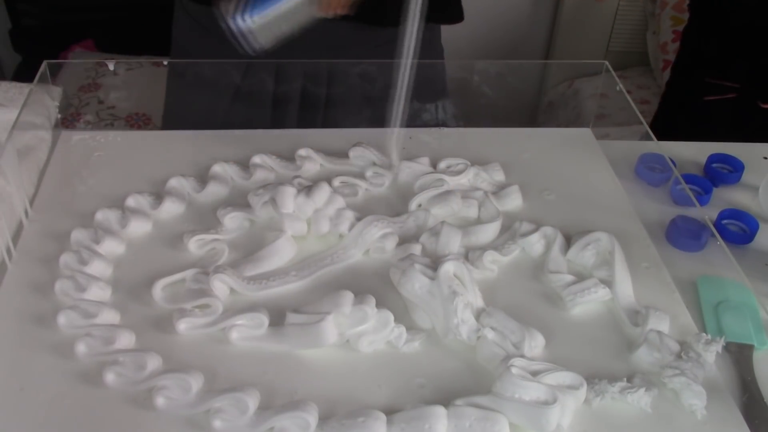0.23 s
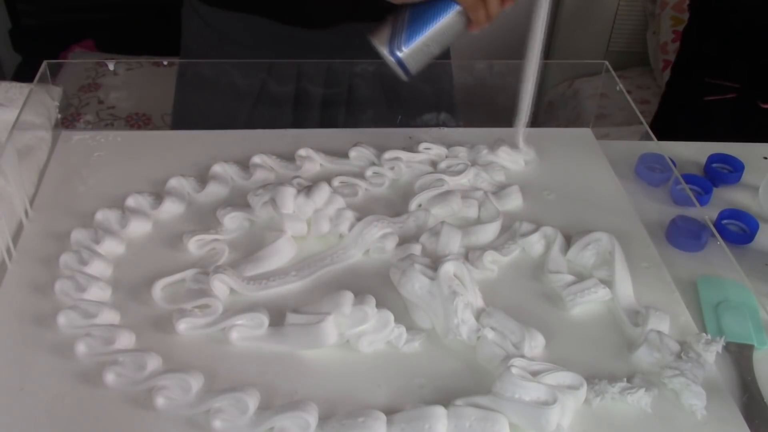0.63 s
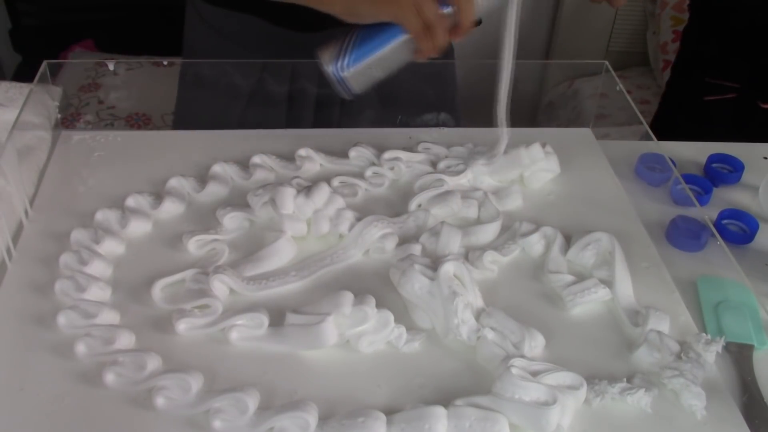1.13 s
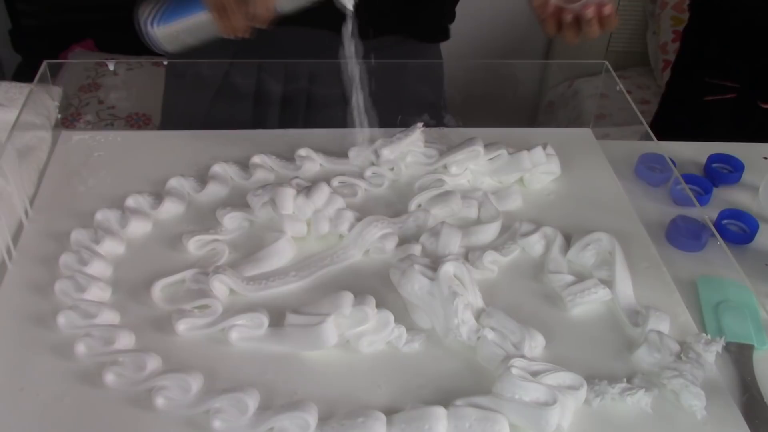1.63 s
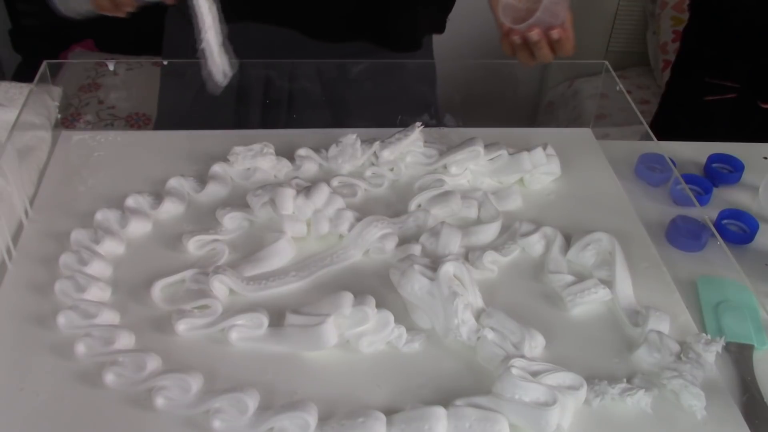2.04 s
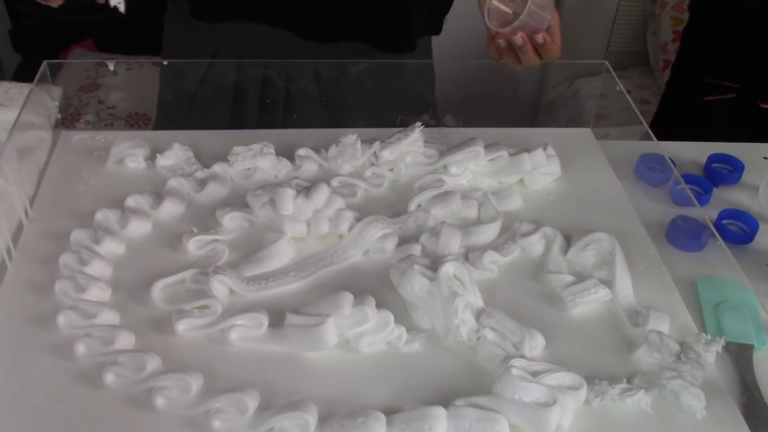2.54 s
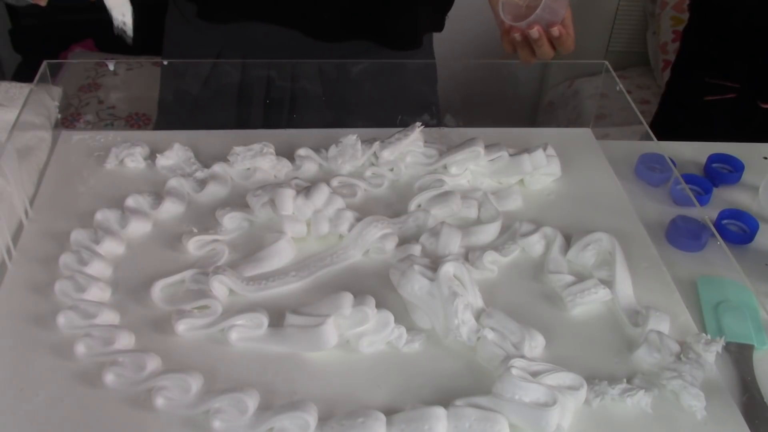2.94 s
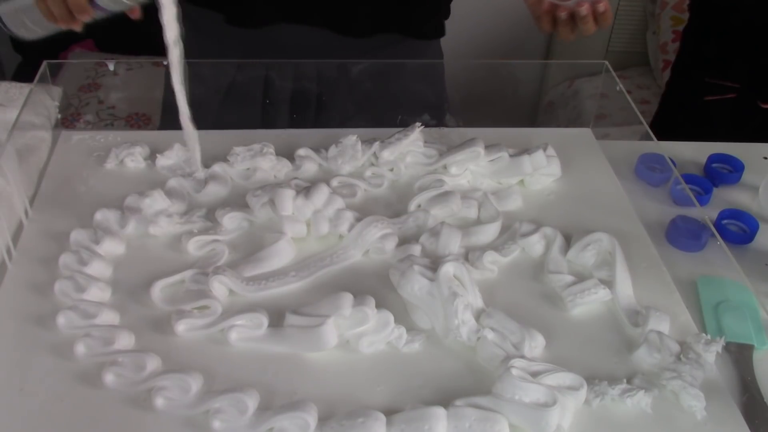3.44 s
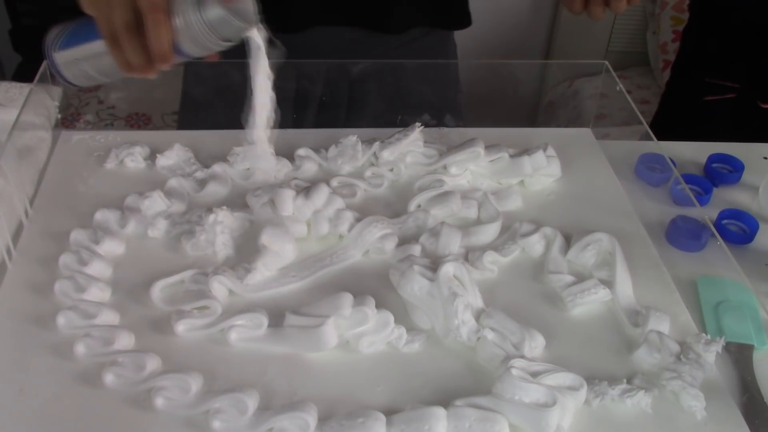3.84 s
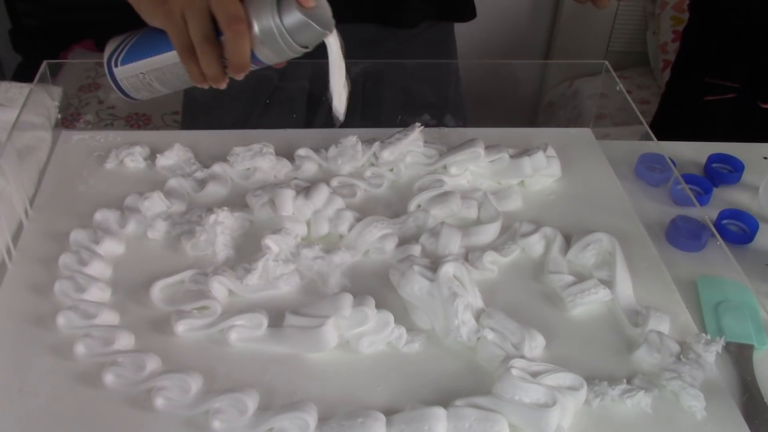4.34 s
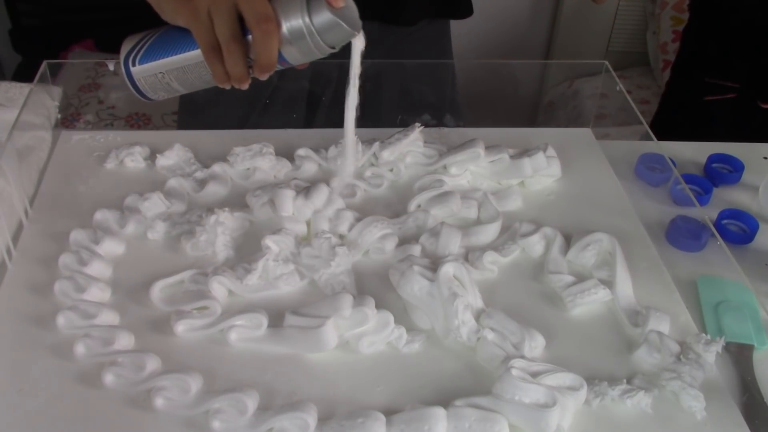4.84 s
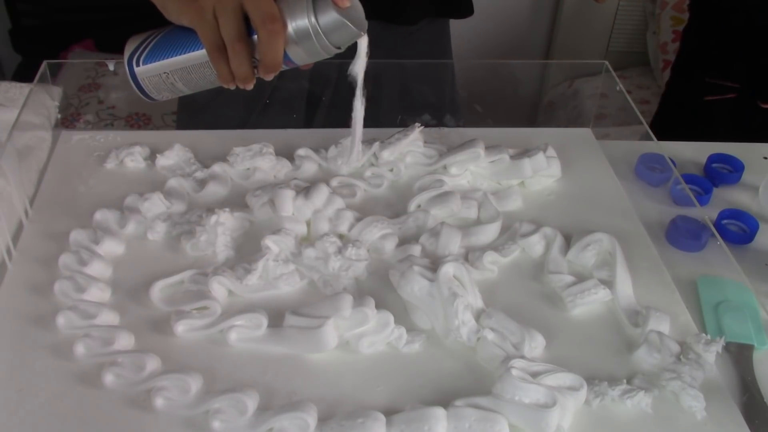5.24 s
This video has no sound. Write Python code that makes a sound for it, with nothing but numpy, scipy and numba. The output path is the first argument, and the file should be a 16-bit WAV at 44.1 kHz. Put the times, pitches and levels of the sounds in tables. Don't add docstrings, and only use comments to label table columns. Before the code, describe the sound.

Foam hisses softly from an aerosol can, then sputters into loud crackling bursts, pauses briefly, and sputters on to the end, close up in a small room.

```python
import sys
import numpy as np
from scipy import signal
from scipy.fft import rfft, irfft
from scipy.io import wavfile
from scipy.ndimage import uniform_filter1d
from numba import njit

SR = 44100
rng = np.random.default_rng(int(sys.argv[2]) if len(sys.argv) > 2 else 0)


def wrap_up_sound(samples):
    columns = np.atleast_2d(samples).T
    tamed = np.clip(columns, -1, 1)
    steps = np.round(tamed * 32767).astype(np.int16)
    wavfile.write(sys.argv[1], SR, steps)


def ratio(d):
    e = np.asarray(d, float) / 20
    return 10 ** e


N = 242726
T = np.arange(N) / SR
TAPS = 2048
FREQ = np.maximum(np.arange(TAPS // 2 + 1) * SR / TAPS, 1)


def shape_db(points, modes=()):
    hz, db = np.transpose(points)
    bumps = sum(boost / (1 + (2 * (FREQ - f) / width) ** 2) for f, width, boost in modes)
    return np.interp(np.log(FREQ), np.log(hz), db) + bumps


def shelf_db(hz, low_db, high_db, octaves=0.27):
    return low_db + (high_db - low_db) / (1 + (hz / FREQ) ** (2 / max(octaves, .1)))


def causal(db):
    ceps = irfft(db * np.log(10) / 20)
    ceps[1:TAPS // 2] *= 2
    ceps[TAPS // 2 + 1:] = 0
    return irfft(np.exp(rfft(ceps)))


def colour(x, db, lo_hz, hi_hz):
    inside = (FREQ > lo_hz) & (FREQ < hi_hz)
    power = np.sum(ratio(db[inside]) ** 2) / len(FREQ)
    return signal.oaconvolve(x, causal(db) / np.sqrt(power))[:len(x)]


@njit
def band(x, hz, width):
    y, b, l = np.empty(len(x)), 0., 0.
    for i in range(len(x)):
        g, k = np.tan(np.pi * hz[i] / SR), width / hz[i]
        v = (b + g * (x[i] - l)) / (1 + g * (g + k))
        b, l, y[i] = 2 * v - b, l + 2 * g * v, k * v
    return y


def noise():
    return rng.standard_normal(N)


def walk(rate):
    k = int(SR / rate)
    held = np.repeat(rng.standard_normal(N // k + 1), k)
    return 1.2 * uniform_filter1d(uniform_filter1d(held, k), k)[:N]


def curve(table, column):
    rows = np.array(table)
    return np.interp(T, rows[:, 0], rows[:, column], left=-120, right=-120)


def strikes(table):
    rows, out = np.array(table), np.zeros(N)
    at = np.minimum((rows[:, 0] * SR).astype(int), N - 1)
    np.add.at(out, at, ratio(rows[:, 1]))
    return out


# f/Hz, level/dB per Hz
HUM = [(15, -62), (25, -35.5), (59, -28), (129, -1.5), (183, -10), (340, -2), (582, -13), (1340, -13.5),
       (2170, -18), (2920, -15), (6500, -27), (15500, -42)]


def hum():
    level_db = -52 + 0.75 * walk(6.7)
    return ratio(level_db) * colour(noise(), shape_db(HUM), 0, 20000)


def crackle(rate, spread_db):
    size_db = spread_db * np.minimum(rng.exponential(size=N), 2)
    out = (rng.random(N) < rate / SR) * ratio(size_db)
    return out / np.sqrt(np.mean(out ** 2))


def puffs(gas, rise_ms=2.5, fall_ms=1.5):
    power = np.zeros(N)
    for s, db, ms in gas[:, :3]:
        i = int(s * SR)
        power[i:i + int(max(ms - 1.5, 1) * SR / 1000)] = ratio(db) ** 2
    t_ms = np.arange(1024) * 1000 / SR
    edge = np.exp(-t_ms / fall_ms)
    choked = signal.oaconvolve(power, edge / edge.sum())[:N]
    return np.sqrt(np.abs(uniform_filter1d(choked, int(rise_ms * SR / 1000) + 1)))


# t/s, froth level/dB, foam plugging the spout/0-1, gas pressure behind the running pockets' pops/dB
FROTH = [
    [(0, -40.5, 0.36, -30), (.5, -42.5, 0.03, -30), (.95, -39, 0.66, -30), (1.2, -39.5, 0.7, -30),
     (1.335, -33, .72, -26), (1.375, -24, 0.67, -22), (1.5, -26, 0.92, -24), (1.75, -18.5, 0.6, -17),
     (2.05, -19, 0.42, -21), (2.385, -21, 0.02, -37)],
    [(2.824, -36, .7, -28), (2.835, -31, 0.9, -28), (2.94, -30.5, 0.64, -26), (3.05, -26.5, 0.65, -28),
     (3.35, -25.5, 0.57, -24), (3.65, -26.5, 0.62, -30), (3.95, -26.5, 0.5, -17), (4.4, -20.5, 0.19, -23.5),
     (4.9, -20.5, 0, -14.5), (5.51, -21, 0.07, -22)],
]
# f/Hz, level/dB per Hz
STREAM = [(47, -62), (80, -52), (133, -23), (236, -7), (336, -0.5), (499, -0.5), (545, -4.5), (1350, -3.5),
          (1880, -6.5), (2790, -5.5), (3640, -13), (7700, -6.5), (10700, -20.5), (12800, -16), (15600, -30)]
SPUTTER = [(47, -41), (80, -54), (139, -16), (211, -18), (343, -4), (488, 0), (609, -7.5), (1320, -5.5),
           (2440, -7), (2920, -2), (4150, -4), (5410, -4), (8230, -6.5), (13100, -19.5), (15600, -31)]
RESTART = [(47, -52), (80, -36), (145, -20), (216, -17), (328, 1.5), (428, -5.5), (478, 1.5), (570, -3.5),
           (1150, 0), (2100, -5), (3050, 3.5), (4340, -3), (8790, -11), (12800, -20), (15600, -29)]
CLOSE = [(47, -59), (80, -53), (139, -15.5), (216, -17.5), (275, -5.5), (428, -12.5), (499, -3), (558, -10),
         (665, 1), (1010, -2.5), (2050, -3.5), (2920, -3), (4150, -2.5), (8790, -4.5), (15600, -25.5)]
# f/Hz, width/Hz, boost/dB
STREAM_MODES = [(345, 90, 2), (1900, 250, -3), (2420, 200, 3), (2950, 250, 2), (3950, 700, -2),
                (5550, 340, 3), (7740, 150, 2), (12500, 300, 3)]
SPUTTER_MODES = [(330, 74, 0.82), (860, 140, 3), (1710, 290, 7), (2420, 210, -5), (3760, 180, 1),
                 (4130, 290, -2.5), (4570, 130, 2), (5380, 180, 4.5), (6870, 180, 7), (8200, 400, 2.5)]
RESTART_MODES = [(2500, 190, 0.5), (3620, 200, -1.5), (4300, 600, -1), (6630, 440, 4.5), (8600, 500, -7)]
CLOSE_MODES = [(332, 82, 2.5), (2270, 41, 2.5), (3340, 190, 1), (3580, 280, 4), (4160, 130, -1.5),
               (4940, 300, 2.5), (5540, 150, 0), (6180, 120, 3), (7200, 280, 3), (8580, 1100, 5),
               (9830, 250, 4)]
TURNS = [.6, 1.25, 1.45, 2.4, 2.8, 3.6, 4.2]


def spray(rows):
    body_db = np.maximum(curve(FROTH[0], 1), curve(FROTH[1], 1))
    plug = np.clip(np.maximum(curve(FROTH[0], 2), curve(FROTH[1], 2)), 0, 1)
    burble_db = body_db - 16 + 12 * plug
    hiss_db = body_db + 3 - 5.5 * plug
    choked = np.interp(T, [1.24, 1.38], [0, 1])

    bubbly = noise() + (0.38 + 0.69 * choked) * crackle(220, 4.9)
    body = ratio(body_db - 4.0 - 5.73 * choked + 2.12 * walk(60) + 1.4 * walk(15)) * bubbly
    burble = ratio(burble_db - 1.5 + 1.2 * walk(40)) * noise()
    hiss = ratio(hiss_db - 1.5 - 14.7 * choked + 1.3 * walk(90)) * noise()
    gas = ratio(-2.0 + 2.24 * walk(300)) * puffs(rows) * (noise() + .5 * crackle(600, 4.9))

    body_shelf = shelf_db(546, -31.0, 0) + shelf_db(5300, 0, -26.0)
    burble_shelf = shelf_db(650, 0, -36.0)
    hiss_shelf = shelf_db(3600, -7.0, 0)
    gas_shelf = shelf_db(3600, -1.06, 0, octaves=0.5)
    states = [shape_db(STREAM, STREAM_MODES), shape_db(SPUTTER, SPUTTER_MODES),
              shape_db(RESTART, RESTART_MODES), shape_db(CLOSE, CLOSE_MODES)]
    state = np.interp(T, TURNS, [0, 0, 1, 1, 2.5, 2.5, 3])
    out = np.zeros(N)
    for k, db in enumerate(states):
        share = np.clip(1 - np.abs(state - k), 0, 1)
        on = share > 0
        sound = colour(body[on], db + body_shelf, 560, 5300)
        sound += colour(burble[on], db + burble_shelf, 200, 600)
        sound += colour(hiss[on], db + hiss_shelf, 6700, 9800)
        sound += colour(gas[on], db + gas_shelf, 3200, 18000)
        out[on] += np.sqrt(share[on]) * sound
    return out


# t/s, first f/Hz, second f/Hz, ring level/dB
SPOUT = [(0, 1440, 2770, -4), (.3, 1420, 2860, 5), (.75, 1410, 2720, 1), (1.2, 1400, 2780, -1),
         (1.31, 1390, 3200, 2), (1.5, 1310, 2740, 4), (1.7, 1320, 3080, -15), (2.1, 1340, 3020, 4.5),
         (2.4, 1370, 3000, 2), (2.8, 1430, 2560, 6.5), (3.1, 1340, 3000, 3.5), (3.35, 1174, 2680, -4),
         (4, 1020, 2750, -7), (4.3, 1300, 2750, -8.5), (4.65, 1315, 2840, 2.5), (5.05, 1325, 2900, -3.5),
         (5.51, 1370, 2870, 4.5)]
# mean f/Hz, width/Hz, scatter/0-1, level/dB
POCKET = [(5425, 250, 0.1, 0), (6440, 66, 0.2, -9), (8650, 270, 0.08, 3), (9620, 320, .06, 2),
          (12650, 1200, 0.09, 1)]


def cavities(x, starts, glide=0.035):
    s, first_hz, second_hz, ring_db = np.transpose(SPOUT)
    gain = ratio(np.interp(T, s, ring_db) + 2.5 * walk(30))
    drift = np.interp(T, [1.1, 1.4], [1.2, 1])
    first = np.interp(T, s, first_hz) * (1 + 0.021 * drift * walk(11))
    second = np.interp(T, s, second_hz) * (1 + 0.023 * drift * walk(17))
    out = x + gain * band(x, first, 81.0)
    out += 0.9 * gain * band(x, second, 175.0)

    pocket = np.maximum(np.searchsorted(starts, T) - 1, 0)
    age = np.clip((T - starts[pocket]) / 0.011, 0, 1.5)
    chance = rng.standard_normal((len(starts), len(POCKET), 2))
    for k, (hz, width, scatter, db) in enumerate(POCKET):
        wander = 0.98 * chance[pocket, k, 0] + 0.5 * walk(5)
        pitch = uniform_filter1d(hz * (1 + scatter * wander + glide * age), size=44)
        gain = ratio(db + 4.5 * np.clip(chance[pocket, k, 1], -2, .8))
        out += (T > starts[0]) * gain * band(x, pitch, 1. * width)
    return out


def ring(hz, decay_ms):
    t = np.arange(256) / SR
    return np.cos(2 * np.pi * hz * t) * np.exp(-t * 1000 / decay_ms)


# t/s, pop level/dB
STREAM_POPS = [(.097, -21), (.175, -25), (.672, -27), (.798, -27), (.956, -26), (1.011, -27), (1.086, -23),
               (1.212, -21)]
# t/s, pop level/dB
FIRST_RUN = [(1.942, -11), (1.9606, -7), (2.0068, -8), (2.085, -9), (2.1045, -11), (2.157, -10),
             (2.175, -15), (2.1945, -12), (2.2808, -15), (2.2888, -13), (2.2964, -10), (2.3046, -10),
             (2.3237, -14)]
SECOND_RUN = [(3.5134, -5.5), (3.552, -5), (3.58, -9.0), (3.6026, -10), (3.6512, -11.0), (3.7, -4),
              (3.726, -10), (3.7622, -14), (3.7907, -12), (3.816, -12), (3.8292, -7), (3.851, -10),
              (3.8585, -8), (3.8838, -10), (3.914, -16), (3.9326, -10), (3.952, -9.5), (3.9678, -7),
              (3.9914, -8), (3.9982, -5), (4.089, -8), (4.1375, -15), (4.144, -11), (4.166, -7.5),
              (4.178, -7), (4.2322, -10), (4.2943, -4.5), (4.326, -15), (4.3546, -9), (4.4063, -16),
              (4.4279, -8.0), (4.4485, -15), (4.4646, -15), (4.487, -11), (4.583, -12), (4.6131, -8.5),
              (4.6338, -10), (4.728, -9), (4.7594, -12), (4.7834, -13), (4.8355, -14), (5.063, -12.5),
              (5.1, -8.0), (5.1812, -7), (5.3348, -6), (5.4088, -12), (5.4478, -12), (5.4969, -9)]


def pops(rows):
    push = signal.windows.hann(9)
    burst = np.convolve(ring(2950, .22) + .35 * ring(1200, 1.1), push)
    events = np.concatenate([rows[:, [0, 3]], STREAM_POPS, FIRST_RUN, SECOND_RUN])
    lag_s = .0015
    crack = signal.oaconvolve(strikes(events + [lag_s, 0]), burst / burst.max())[4:N + 4]
    return crack + 2.56 * band(crack, curve(SPOUT, 2) * (1 + 0.05 * walk(40)), 255.0)


# t/s, treble level/dB, length/ms, plug pop level/dB
FIRST = [(1.195, -33, 5.1, -31), (1.319, -33.5, 4, -20), (1.289, -37, 4.4, -22), (1.345, -31, 5, -30),
         (1.356, -35, 3.2, -25), (1.364, -27, 4.8, -24), (1.371, -32, 12, -14), (1.385, -24, 4.8, -18),
         (1.392, -28, 4.8, -23), (1.407, -32.5, 25, -14), (1.431, -22, 7.2, -25), (1.445, -22, 6.1, -12),
         (1.457, -21, 7, -19), (1.471, -22, 19, -22), (1.5, -20, 6.5, -22), (1.516, -17.5, 8.7, -17),
         (1.53, -20, 7.3, -13), (1.542, -19.5, 18, -12), (1.567, -20.5, 10.5, -23), (1.591, -15, 5.5, -16),
         (1.607, -20.5, 21, -23), (1.641, -14.5, 8.9, -9), (1.664, -20.5, 21, -22), (1.697, -18, 9, -16),
         (1.723, -22, 8.7, -17), (1.733, -17, 14, -15), (1.751, -16, 5.7, -13), (1.765, -23.5, 37, -15),
         (1.805, -21, 11, -8), (1.843, -18, 15, -14)]
SECOND = [(2.832, -24, 6.7, -20), (2.844, -32, 3.7, -30), (2.859, -24, 4, -9.5), (2.871, -23, 5.2, -4),
          (2.886, -25.5, 6.8, -13), (2.906, -32, 7.9, -21), (2.975, -26.5, 6, -19), (2.982, -25, 4.2, -8),
          (2.993, -32, 4, -12), (3.001, -26, 3.5, -17), (3.01, -31, 3.6, -19), (3.017, -21, 4.4, -12),
          (3.027, -28, 4.9, -3), (3.038, -21, 3.6, -15), (3.045, -25, 4.3, -17), (3.058, -29, 4.5, -24),
          (3.071, -22, 6.5, -5.5), (3.093, -20, 5.5, -20), (3.107, -23, 10.3, -20), (3.127, -24, 7.4, -23),
          (3.138, -21, 12.4, -11), (3.168, -21, 5.8, -8), (3.184, -20.5, 7.1, -15), (3.209, -24.5, 16, -14),
          (3.244, -21, 7.4, -13), (3.275, -20.5, 17, -9), (3.265, -22, 7.3, -6), (3.33, -25, 11, -9),
          (3.349, -21.5, 6.5, -22), (3.364, -23, 4.8, -10), (3.381, -23, 7.8, -13),
          (3.401, -23.5, 6.2, -20), (3.421, -23.5, 12, -13), (3.447, -23, 8.1, -13), (3.467, -25, 9.9, -9),
          (3.492, -22, 10.6, -11)]
# t/s, treble
# level/dB, length/ms
FULL_FLOW = [(1.862, -21, 25), (1.899, -21, 9.3), (1.914, -22, 20), (1.937, -20.5, 11), (1.955, -22, 37),
             (1.992, -23.0, 7.4), (2.004, -20.5, 6.9), (2.018, -18, 17), (2.032, -21.5, 27),
             (2.072, -22, 16), (2.102, -24, 10.1), (2.113, -19.5, 22), (2.139, -27, 7.6),
             (2.153, -18, 11.4), (2.174, -20.5, 32), (2.201, -22, 13), (2.216, -19.5, 15.5),
             (2.236, -24, 21), (2.257, -17, 10), (2.273, -21.5, 24), (2.294, -20, 19), (2.312, -23, 21),
             (2.335, -23.5, 29), (2.358, -18, 6.2), (2.371, -29, 12.4),
             (3.51, -25.5, 16), (3.536, -31, 25), (3.563, -28, 12), (3.578, -19.5, 7.9), (3.603, -26, 11),
               (3.626, -27.4, 11.3), (3.647, -20, 6.8), (3.67, -25.5, 11), (3.693, -24.5, 14.9),
               (3.715, -19.5, 5.8), (3.728, -21.5, 5.6), (3.737, -22.5, 10.6), (3.76, -21.5, 15),
               (3.786, -24.5, 10), (3.801, -24.5, 9.3), (3.816, -24.5, 12.8), (3.828, -23, 6.2),
               (3.848, -24.7, 7.9), (3.858, -24, 15), (3.885, -19.5, 9.3), (3.915, -22, 11),
               (3.931, -22, 11.5), (3.95, -21.5, 11), (3.968, -20.5, 13), (3.988, -25, 12),
               (4.011, -22.5, 14.6), (4.03, -21, 13), (4.049, -20.5, 34), (4.089, -21, 15),
               (4.111, -22, 24), (4.137, -22, 9.8), (4.149, -21, 12.7), (4.168, -21.5, 27),
               (4.188, -21, 12.3),
             (4.199, -24, 6), (4.219, -21, 8.8), (4.228, -21.6, 11), (4.243, -21, 14), (4.266, -21, 13),
               (4.285, -21, 23), (4.306, -22, 6.2), (4.312, -21, 9.3), (4.326, -24, 16), (4.35, -20, 35),
               (4.386, -23.5, 8.3), (4.397, -20, 11), (4.415, -19, 8.1), (4.428, -21.5, 24),
               (4.463, -19, 5.3), (4.47, -22, 10), (4.487, -19.5, 6.5), (4.506, -17.5, 5.7),
               (4.516, -22.5, 27), (4.546, -24.5, 19), (4.569, -22, 27), (4.6, -22.5, 9.2),
               (4.614, -19.5, 13), (4.631, -21, 17), (4.651, -21, 8.2), (4.664, -22, 14), (4.686, -18, 6.9),
               (4.697, -21, 24), (4.718, -19, 4.8), (4.729, -20, 6.7), (4.743, -21.5, 23),
               (4.768, -19.5, 15), (4.792, -20.5, 21), (4.814, -23, 16), (4.834, -21, 11),
               (4.853, -21.5, 19),
             (4.875, -24, 9.6), (4.886, -21, 5.6), (4.896, -21, 15), (4.916, -22, 8.5), (4.933, -20, 6.4),
             (4.944, -19, 8.3), (4.956, -21, 23.2), (4.981, -21, 9.5), (4.993, -25, 16), (5.019, -21, 6.9),
             (5.027, -20.5, 9.2), (5.043, -20.5, 6.6), (5.058, -22, 10), (5.072, -18.5, 6.1),
             (5.09, -20.5, 22), (5.116, -19, 8.7), (5.131, -19, 13), (5.151, -23, 22), (5.178, -19, 6.6),
             (5.198, -20, 12.3), (5.213, -20, 7.4), (5.228, -21, 14), (5.252, -20, 5.2), (5.261, -21.5, 12),
             (5.277, -23, 5.1), (5.287, -23.5, 17), (5.313, -24, 17), (5.336, -24, 27), (5.371, -21, 8.5),
             (5.389, -22.5, 15), (5.406, -19.7, 5.7), (5.422, -18.5, 8.4), (5.432, -28, 11),
             (5.445, -25, 27), (5.468, -23.5, 29), (5.492, -24, 8.2)]


def pockets():
    flow = np.array(FULL_FLOW)
    froth = np.concatenate(FROTH).T
    luck = np.clip(rng.standard_normal(len(flow)), -3, 1.5)
    pressure_db = np.interp(flow[:, 0], froth[0], froth[3])
    pop_db = pressure_db + 0.5 + 4 * luck
    level_db, longer_ms = -0.12, 0.81
    running = np.c_[flow + [0, level_db, longer_ms], pop_db]
    rows = np.concatenate([FIRST, SECOND, running])
    return rows[np.argsort(rows[:, 0])]


# t/s, level/dB, whistle f/Hz
LEAK = [
    (2.62, -74, 2920),
    (2.665, -59, 2700),
    (2.7, -50, 2350),
    (2.75, -52, 2550),
    (2.785, -45, 2870),
    (2.82, -47.5, 2500),
]
# t/s, peak level/dB, weight/0-1
TICKS = [
    (2.578, -46, 0.1),
    (2.585, -49, 0),
    (2.8245, -36, 1),
    (2.833, -24, 1),
]


def valve():
    gas = ratio(curve(LEAK, 1) + 2.0 * walk(78)) * noise()
    seep_db = shape_db([(1200, -30), (2300, 1.0), (3000, 5), (3700, 3), (4600, -40)])
    seep = colour(gas, seep_db, 2200, 4000)
    s, _, hz = np.transpose(LEAK)
    seep = 0.75 * seep + 1.3 * band(seep, np.interp(T, s, hz), 170.)

    grit = rng.standard_normal(256) * np.exp(-np.arange(256) * 1000 / SR / 1.3)
    tick = signal.oaconvolve(strikes(TICKS), grit)[:N]
    s, _, weight = np.transpose(TICKS)
    bright = colour(tick, shelf_db(5300, -15.5, 0) + shelf_db(11000, 0, -17.0), 0, 20000)
    heavy = colour(tick, shelf_db(2500, -14, 0) + shelf_db(5800, 0, -24), 0, 20000)
    return seep + bright + np.interp(T, s, weight) * heavy


def tray(x, echo_db=-16, lag_ms=.85, sway=.06):
    lag_s = lag_ms * (1 + sway * walk(2)) / 1000
    return x + ratio(echo_db) * np.interp(T - lag_s, T, x)


# f/Hz, decay by 60 dB/s
ROOM_T60 = [(200, 0.34), (1500, 0.31), (5000, 0.38), (12000, 0.23)]


def room(x, delay_ms=3.7):
    t, tail = np.arange(SR // 2) / SR, 0
    f, decay_s = np.transpose(ROOM_T60)
    for hz in 125 * 2. ** np.arange(7.5):
        t60 = np.interp(np.log(hz), np.log(f), decay_s)
        edges = [hz / np.sqrt(2), min(hz * np.sqrt(2), 20000)]
        octave = signal.butter(2, edges, "band", fs=SR, output="sos")
        decay = np.exp(-np.log(1000) * t / t60)
        tail = tail + signal.sosfilt(octave, rng.standard_normal(len(t))) * decay
    tail = tail * np.clip(t * 1000 / delay_ms - 1, 0, 1)
    return signal.oaconvolve(x, tail / np.sqrt(np.sum(tail ** 2)))[:N]


# f/Hz, side minus mid level/dB
WIDTH = [(60, -12), (110, -19), (200, -40), (380, -35), (700, -28), (1290, -24), (2380, -22.5), (4400, -15),
         (8120, -18), (15000, -22)]
# t/s, left minus right treble level/dB
LEAN = [(0, .3), (2.2, .9), (5.5, .4)]


def scene():
    rows = pockets()
    nozzle = ratio(-1.2) * cavities(spray(rows), rows[:, 0])
    dry = tray(nozzle + pops(rows)) + valve()
    mid_hum, side_hum = hum(), hum()
    softened = signal.oaconvolve(dry, causal(shelf_db(8600, 0, -8.0)))[:N]
    mid = dry + ratio(-6.5) * room(softened) + mid_hum
    walls = room(dry, delay_ms=0.86)
    side = signal.oaconvolve(walls, causal(shape_db(WIDTH)))[:N] + ratio(-10.5) * side_hum
    lean = ratio(np.interp(T, *np.transpose(LEAN)))
    side += (lean - 1) / (lean + 1) * band(mid, np.full(N, 4500.), 4500.)
    return np.array([mid + side, mid - side])


def rumble():
    return colour(ratio(-87 + 4 * walk(8)) * noise(), shelf_db(70, 0, -37), 20, 60)


def band_limit(x):
    return signal.sosfilt(signal.butter(12, 15800, fs=SR, output="sos"), x)


def record(dry):
    thin = signal.sosfilt(signal.butter(3, 110, "high", fs=SR, output="sos"), dry)
    rounded = np.tanh(.8 * thin) / .8
    limited = signal.sosfilt(signal.ellip(14, .2, 50, 15780, fs=SR, output="sos"), rounded)
    shared, left, right = rumble(), rumble(), rumble()
    mix = limited + shared + .9 * np.array([left, right])
    return band_limit(mix)


dry = scene()
out = record(dry)
wrap_up_sound(out)
```